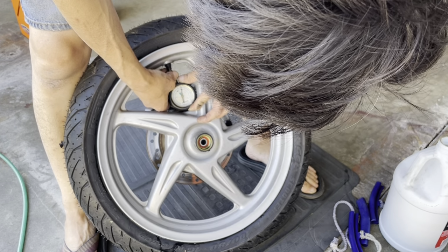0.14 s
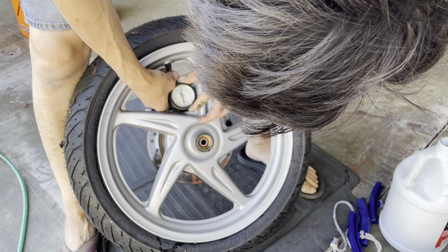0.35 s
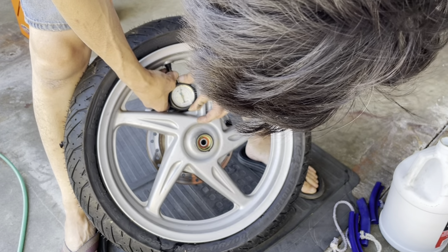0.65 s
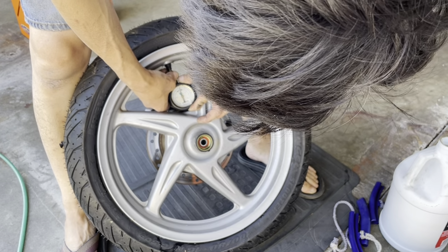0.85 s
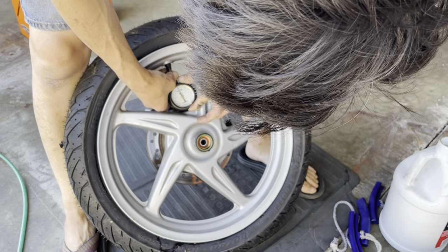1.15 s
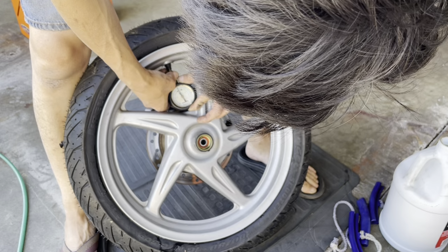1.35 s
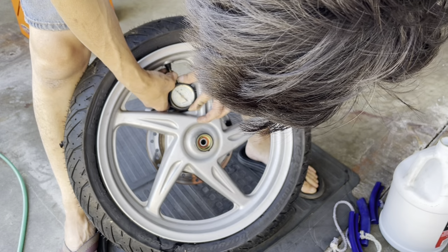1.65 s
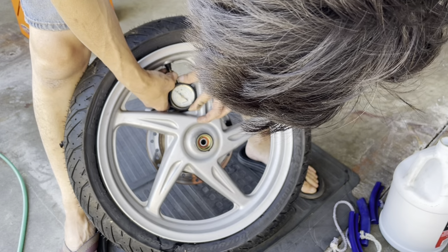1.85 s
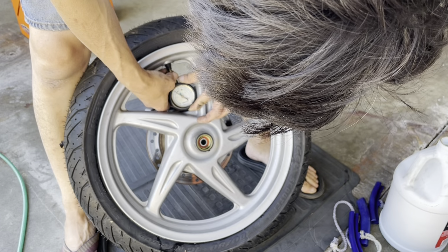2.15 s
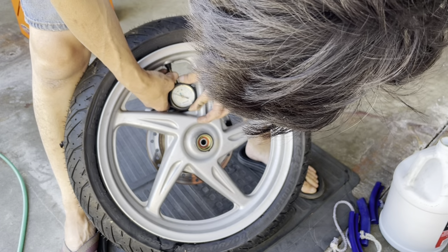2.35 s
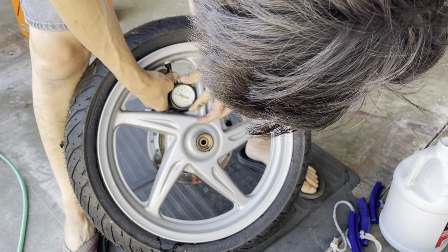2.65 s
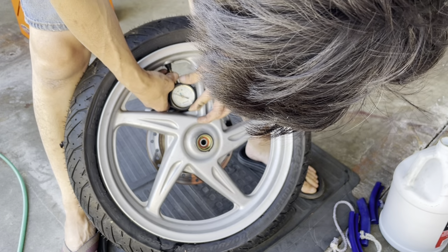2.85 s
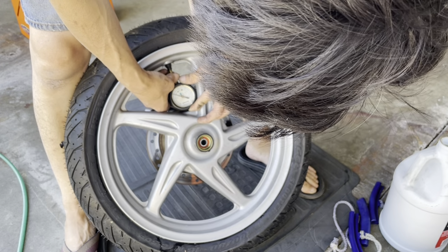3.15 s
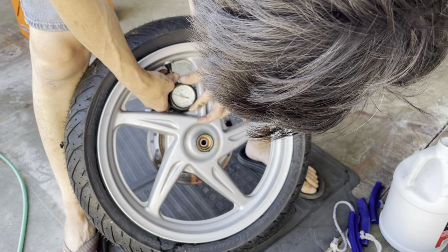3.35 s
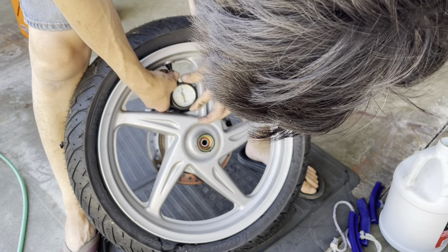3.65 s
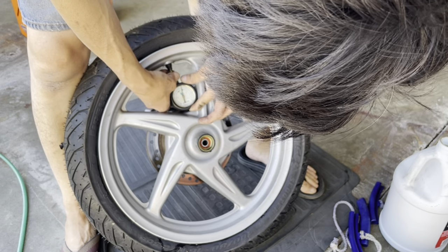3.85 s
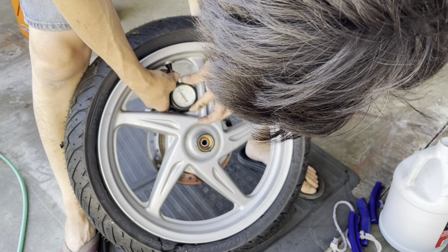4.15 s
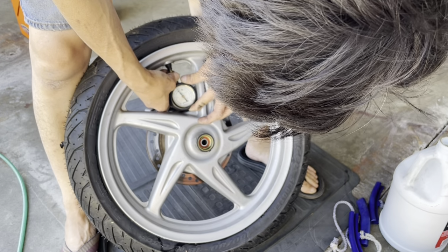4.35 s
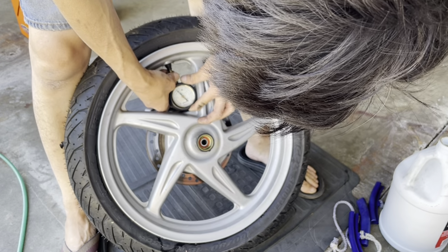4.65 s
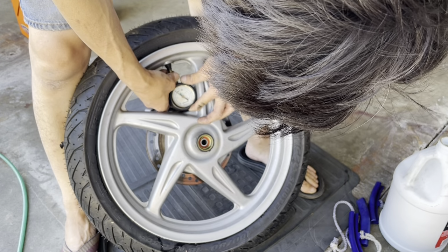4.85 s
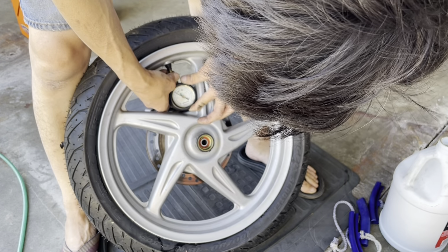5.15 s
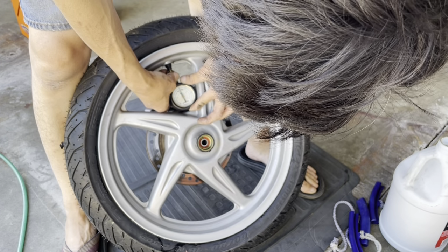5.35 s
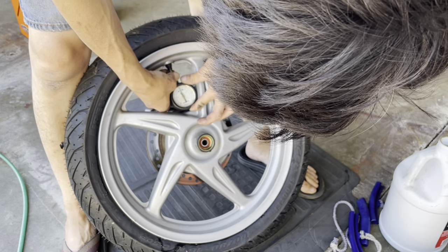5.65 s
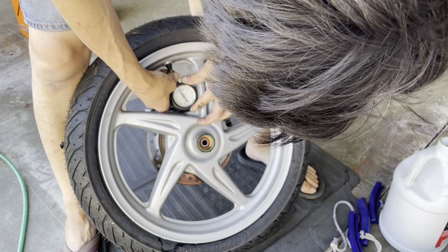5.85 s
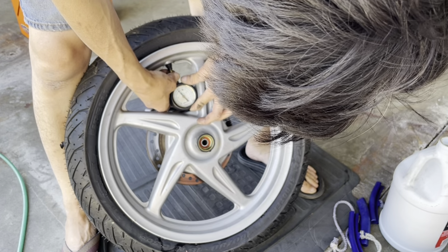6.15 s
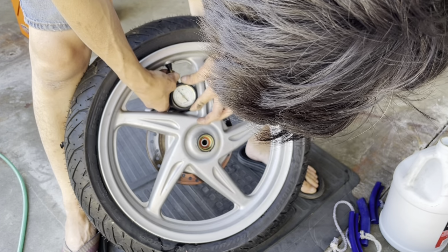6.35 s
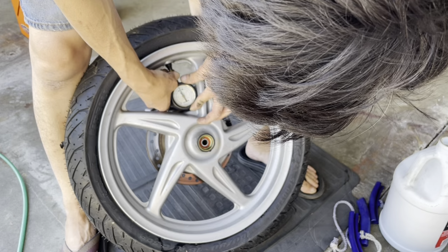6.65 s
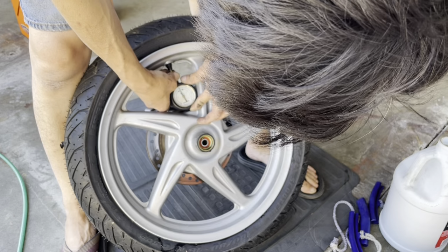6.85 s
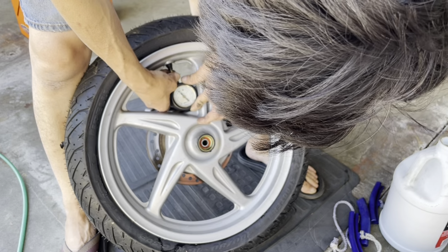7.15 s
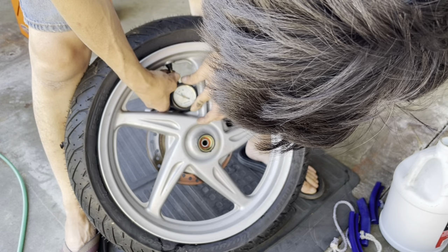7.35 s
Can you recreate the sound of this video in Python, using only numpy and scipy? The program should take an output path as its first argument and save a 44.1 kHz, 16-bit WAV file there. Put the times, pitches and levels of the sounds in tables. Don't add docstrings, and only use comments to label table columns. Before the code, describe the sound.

Close stereo sound in a hard-walled yard. From 0 s a loud, dense, bright hiss of air leaves a scooter tyre valve, with a breathy lower roar that wavers as the pin is pressed. At about 2.4 s it eases a little, then chokes off around 3.4-3.6 s. A thin airy leak and whistle follow, with a dry tick at 3.8 s. A softer second burst cracks open near 3.9 s, grows, and closes after 5.3 s into a narrow whistle. A short, uneven third burst runs about 5.75-6.5 s, followed by a low whistle, a quick slowing rubber creak at 6.6 s and a faint wheeze. The fourth burst seeps in at 6.9 s, swells strongly from 7.1 s and is still hissing at the 7.5 s end. Short echoes surround it; a distant slow engine drones, strongest early, with faint fan hum and low neighbourhood rumble.

```python
import sys
import numpy as np
from scipy import signal
from scipy.fft import rfft, irfft, next_fast_len
from scipy.io import wavfile
from scipy.ndimage import uniform_filter1d

SR = 44100
rng = np.random.default_rng(int(sys.argv[2]) if len(sys.argv) > 2 else 0)


def gain_from_db(level_db):
    decades = np.asarray(level_db, float) / 20
    return 10 ** decades


def pcm_store(signal):
    levels = np.round(np.clip(np.atleast_2d(signal), -1, 1) * 32767)
    wavfile.write(sys.argv[1], SR, levels.astype(np.int16).T)


N = 330309


def evened(x):
    return x / np.sqrt(np.mean(x ** 2) + 1e-20)


def read(points, hz):
    f, value = np.transpose(points)
    return np.interp(np.log(hz + 1), np.log(f + 1), value)


def ports(a, b, same, lead, left_db, right_db):
    same = np.clip(same, 0, 1)
    right = (same * a + np.sqrt(1 - same ** 2) * b) * np.exp(-1j * lead)
    return np.array([a * gain_from_db(left_db), right * gain_from_db(right_db)])


def presses():
    # time in seconds, flow in dB, pin depth as roar
    # over hiss in dB, spill on the rim as blow over hiss in dB.
    long_release = [(0, -29, -5.5, -12), (.1, -25.5, -3.5, -18), (.25, -27, -0.5, -14), (.47, -27, -2, -18.5),
                    (.67, -29, -2, -17), (1.3, -28.5, -3, -15.5), (1.75, -27, -7, -17), (2.38, -27.5, -6, -18.5),
                    (2.43, -30, -4.5, -11), (2.57, -29, -4.5, -9.5), (2.85, -31.5, -2, -8), (3.1, -31, -3.5, -9),
             (3.3, -31.5, -2.5, -11), (3.421, -31.5, -4.5, -6.5)]
    second = [(3.937, -42.5, -9, -20), (3.96, -47, -6, -16), (4.01, -36.5, -4.5, -9.5),
              (4.149, -37, -5, -14.5), (4.349, -35, -6, -15.5), (4.55, -36, -6.5, -14.5),
              (4.75, -32.5, -7.5, -18.5), (5.1, -33, -6.5, -16.5), (5.289, -32, -6.5, -16)]
    third = [(5.763, -37.5, -6.5, -7), (5.81, -41, 9, -10), (5.871, -38, 1, -6.5), (5.95, -34, -5.5, -8),
             (6, -31, -3, -18), (6.1, -34.5, -0.5, -13), (6.25, -33.5, -3.5, -13.5),
             (6.399, -34.5, -2.5, -11), (6.46, -32, -3, -15)]
    fourth = [(6.911, -45, -12, -14), (6.958, -44.5, -5.5, -7), (7.07, -39, -10, -23),
              (7.098, -34, -8.5, -14), (7.112, -34, 0, -16.5), (7.25, -30, -1, -10),
              (7.32, -26.5, -1.5, -22.5), (7.4, -27.5, -1.5, -17), (7.49, -26.5, -3.5, -22.5)]
    # seconds from the first row, flow in dB, lower parts in dB.
    crack_open = [
        (-.17, -63, 0),
        (-.09, -40.5, 11),
        (-.048, -32, -6),
        (-.02, -13, -0.5),
    ]
    # seconds from the last row, flow in dB, lower parts in dB.
    closing = [
        (0.039, -9.5, 1.8),
        (.08, -26, 3.1),
        (.15, -39, 7),
        (0.271, -62, 12),
    ]
    # whistle over hiss in dB, extra seep before the crack in dB.
    seating = [
        (-1.5, 0),
        (-1, -1.5),
        (-3, -7.5),
        (0.5, -0.5),
    ]
    crack_s = .03
    whistle_per_depth = 0.48
    rows = []
    for press, (whistle_db, seep_db) in zip((long_release, second, third, fourth), seating):
        first, last = np.array(press[0]), np.array(press[-1])
        opening = [first + [s, db + seep_db * (s < -crack_s), low, low] for s, db, low in crack_open]
        shutting = [last + [s, db, low, low] for s, db, low in closing]
        for row in opening + press + shutting:
            rows.append([*row, whistle_db + whistle_per_depth * row[2]])
    rows = np.array(rows)
    return rows[np.argsort(rows[:, 0])]


def jet(patchy_db=0.88, flutter_db=0.29, dulling=0.2, ceiling=.4):
    # centre in Hz, usual offset in dB.
    parts = [
        (320, -14.5),
        (1550, -8),
        (2600, -7.5),
        (5700, -7.5),
        (10000, 1.5),
        (13000, -2.5),
        (15300, -4),
    ]
    jet_db = 6.5
    fresh_db, fresh_s, spent_db = 2, 2, -1.5
    rows, frames = presses(), N // 64 + 5
    t, hz = np.arange(frames) * 64 / SR, np.fft.rfftfreq(256, 1 / SR)
    hiss, roar, blow, whistle = (np.interp(t, rows[:, 0], rows[:, k]) for k in range(1, 5))
    centre, usual = np.transpose(parts)

    low_roar = roar + spent_db + fresh_db * np.exp(-t / fresh_s)
    upper = -dulling * np.clip(roar - usual[1], -5, 5)
    flowing = np.clip((hiss + 70) / 15, 0, 1)
    edge = -ceiling * np.clip(hiss + 31, -9, 5) * flowing
    shares = np.array([read(np.c_[centre, one], hz) for one in np.eye(len(parts))])
    levels = np.array([blow, low_roar, roar, whistle, 0 * t, upper, edge])
    offsets = np.clip(levels - usual[:, None], -15, 9)

    a, b, c, d, patches = rng.standard_normal((frames, 129, 5)).T
    patches = uniform_filter1d(patches, size=5, axis=0)
    patches = evened(uniform_filter1d(patches, size=60, axis=1))
    flutter = evened(uniform_filter1d(rng.standard_normal(frames), size=24))
    colour = gain_from_db(shares.T @ offsets + patchy_db * patches + flutter_db * flutter)
    z = np.array([a + 1j * b, c + 1j * d])
    unit = np.std(signal.istft(z, nperseg=256, noverlap=192)[1])
    noise = signal.istft(z * colour, nperseg=256, noverlap=192)[1][:, :N] / unit
    return noise * gain_from_db(jet_db + np.interp(np.arange(N) / SR, t, hiss))


def nearby(a, b):
    # Hz, dB.
    right_colour = [(258, -10), (1000, -8.5), (1650, -6), (2500, -6), (3400, -7.5), (3750, -9.5),
                    (4700, -11.5), (6300, -6.5), (8900, 0.5), (10465, 0.5), (11843, -3.5), (13178, -3),
                    (15590, -4.5),
                    (7000, -6), (7700, -4.5), (14400, -5)]
    # Hz, left minus right in dB.
    facing = [(300, 1.5), (900, 4), (1600, 6), (1800, .5), (2400, .5), (2900, 3), (3700, 1.5), (4100, 4),
              (4450, 2), (4950, 2), (5500, 7), (6000, 5.5), (6200, 3), (6500, 3)]
    # Hz, lead in radians.
    left_lead = [(150, .8), (400, .4), (800, .75), (1550, .8), (1800, 0), (2100, .9), (2400, 0), (2750, 1.1),
                 (3500, 1.6), (3680, 2.1), (3850, .4), (4080, -2.3), (4300, -.4), (5100, -.1),
                 (6700, -2.75), (7600, -3.3), (8300, -4.05), (10400, -5.95), (11700, -6.6), (13800, -9.15),
                 (15050, -9.6), (15700, -10.3)]
    # Hz, likeness from 0 to 1.
    port_likeness = [(170, .9), (450, .98), (950, .85), (1200, .92), (1450, .35), (1800, .98), (2100, .65),
                     (2420, .98), (2900, .75), (3300, .8), (3680, .6), (3950, .3), (4850, .88), (6200, .7),
                     (6550, .8), (6850, .97), (7800, .97), (8400, .88), (10000, .9), (10500, .985),
                 (11700, .985), (12300, .82), (13500, .85), (13900, .97), (15050, .98), (15600, .7)]
    # centre in Hz, width in Hz, left in dB, right in dB.
    stem = [(350, 120, 2, 1), (540, 80, 2.5, 2), (960, 100, 2, 0), (1070, 70, 1, 3), (1270, 80, -3, 1),
            (1370, 70, 0, -4), (1590, 90, 1, 2), (1680, 60, 0, -3), (1770, 70, 0, 2), (2030, 110, -3, 0),
            (2160, 90, 2, -4), (2410, 100, -4, -3), (2780, 160, 2, 2.5), (2980, 120, -3, -2),
            (3200, 200, 1, 1.5), (3720, 200, -5, -4), (4100, 160, 2, 1), (5600, 100, -2, -2),
            (5800, 140, 1.5, -1), (5920, 160, 0, 4), (6800, 200, 1.5, 1.5), (7100, 200, -2, -2),
            (7370, 150, 1.5, 1.5), (7600, 250, -2, -2), (7970, 150, 2, 2), (9200, 250, 1.5, 1.5),
            (9560, 200, 1.5, 1.5), (11025, 500, 4, 4), (13680, 350, -4.5, -4.5), (15120, 250, 3, 3)]
    size = next_fast_len(N + 4096)
    hz = np.fft.rfftfreq(size, 1 / SR)
    right_db = read(sorted(right_colour), hz)
    left_db = right_db + read(facing + [(6800, 0)], hz)
    lead = np.interp(hz, *np.transpose(left_lead))
    same = read(port_likeness, hz)
    z = ports(rfft(a, size), rfft(b, size), same, lead, left_db, right_db)
    for f, width, *db in stem:
        z = z * gain_from_db(np.outer(db, 1 / (1 + (2 * (hz - f) / width) ** 2)))
    z = z * hz ** 2 / (hz ** 2 + 133.0 ** 2)
    return irfft(z, size)[:, :N]


def walls(x):
    # Hz, time to fall 60 dB in seconds.
    decay = [(300, .6), (1500, 0.57), (5000, 0.47), (10000, 0.16), (13000, .25), (15000, 0.1)]
    taps = np.zeros((2, SR))
    at = np.arange(300, SR - 20, 20) + rng.integers(0, 20, (2, (SR - 301) // 20))
    np.put_along_axis(taps, at, rng.choice([-1., 1.], at.shape), 1)
    hz, t, z = signal.stft(taps, SR, nperseg=256)
    tail = signal.istft(z * gain_from_db(-60 * t / read(decay, hz)[:, None]), SR, nperseg=256)[1]
    return signal.fftconvolve(x, tail / np.linalg.norm(tail[0]), axes=1)[:, :N]


def air(patchy_db=5.0):
    # Hz, dB per Hz.
    hush = [(15, -47), (30, -20.5), (60, -1), (125, -11), (202, -13), (300, -16.5), (500, -24), (700, -24),
            (950, -24.5), (1250, -37.5), (2000, -49.5), (3700, -44), (8000, -56.5), (15000, -70)]
    # Hz, likeness from 0 to 1.
    likeness = [(25, 0.87), (50, 0.98), (75, .75), (250, .6), (600, 0), (2000, .1), (10000, .1)]
    frames, hz = N // 512 + 5, np.fft.rfftfreq(2048, 1 / SR)
    a, b, c, d, patches = rng.standard_normal((frames, 1025, 5)).T
    patches = uniform_filter1d(patches, size=6, axis=0)
    patches = evened(uniform_filter1d(patches, size=20, axis=1))
    patches = patches / (1 + hz[:, None] / 900)
    colour = read(hush, hz)[:, None] + patchy_db * patches
    z = ports(a + 1j * b, c + 1j * d, read(likeness, hz)[:, None], 0, colour, colour - .6)
    return gain_from_db(-59) * evened(signal.istft(z, nperseg=2048, noverlap=1536)[1][:, :N])


def order_db(steady_db, swells, t):
    level = gain_from_db(steady_db)
    for s, length, db in swells:
        level = level + gain_from_db(db) * np.cos(np.pi * np.clip((t - s) / length, -.5, .5))
    return 20 * np.log10(level)


def drone(lead=.9, low_lead=.3, waver_db=1.8, drift=.45):
    # time in seconds, firing rate in Hz.
    firing = [(0, 61.06), (1.9, 60.2), (3.3, 60.6), (5.3, 60.3), (7.49, 60.23)]
    orders = (1, 2, 3, 4, 6)
    steady = [-81, -72, -76.5, -73, -78]
    # middle in seconds, length in seconds, dB.
    order_swells = [
        [(0, 4.7, -60), (4.6, 1.4, -64), (5.2, .7, -61), (6.8, 2.7, -63.5)],
        [(.9, 3.6, -47.5), (4.5, 1.1, -54.5), (5.15, 0.92, -58), (7.1, 2.3, -57.5)],
        [(0, 1.84, -53.5), (3.85, 0.94, -64), (4.8, 0.77, -67), (7.3, 2.1, -67.5)],
        [(.4, 3.2, -59), (2.5, 2.3, -66), (3.25, 0.44, -59), (4.3, 1.17, -62), (6.15, 1.09, -63.5),
         (7.49, 1.5, -63)],
        [(2.3, .8, -61), (3.4, 1, -72), (4.5, .7, -67)],
    ]
    t = np.arange(N) / SR
    hz = np.interp(t, *np.transpose(firing))
    turn = 2 * np.pi * np.cumsum(hz) / SR
    slow = rng.standard_normal((10, N // 100 + 1))
    slow = uniform_filter1d(slow, size=60, axis=1)
    slow = evened(uniform_filter1d(slow, size=60, axis=1))
    slow = np.repeat(slow, 100, axis=1)[:, :N]
    slow = uniform_filter1d(slow, size=200, axis=1)
    lag, out = np.array([[0], [lead]]), 0
    for j, (k, db, swells) in enumerate(zip(orders, steady, order_swells)):
        level_db = np.interp(t, t[::100], order_db(db, swells, t[::100])) + waver_db * slow[j]
        port_lag = lag * (low_lead if k == 1 else 1)
        wander = (5 if k == 1 else 1) * drift * slow[j + len(steady)]
        out = out + np.sqrt(2) * gain_from_db(level_db) * np.sin(k * turn - port_lag + wander)
    return out


def fan():
    waver = evened(uniform_filter1d(rng.standard_normal((2, N)), size=9000, axis=1))
    turn = 2 * np.pi * np.cumsum(104 + 1.7 * waver[1]) / SR
    return gain_from_db(-64.5 + 2.5 * waver[0]) * np.sqrt(2) * np.sin(turn)


def seal():
    # start in seconds, length in seconds, centre in Hz, width in Hz, level in dB.
    seeps = [
        (3.606, 0.29, 11600, 5050, -83),
        (3.744, 0.12, 6500, 500, -65.5),
        (3.75, .1, 6950, 250, -64),
        (5.381, 0.17, 6770, 250, -55),
        (6.563, 0.14, 3700, 600, -60),
        (6.802, .09, 8600, 500, -87),
        (6.8, .09, 11500, 400, -82),
    ]
    # time in seconds, level in dB.
    ticks = [
        (3.8015, -45.5),
    ]
    out, t = np.zeros(N), np.arange(N) / SR
    noise = rng.standard_normal(N)
    for s, length, hz, width_hz, db in seeps:
        band = signal.butter(2, [hz - width_hz / 2, hz + width_hz / 2], "band", fs=SR, output="sos")
        swell = np.sin(np.pi * np.clip((t - s) / length, 0, 1) ** 0.81)
        out += gain_from_db(db) * swell * evened(signal.sosfilt(band, noise))
    dull = signal.butter(3, [900, 6000], "band", fs=SR, output="sos")
    for s, db in ticks:
        burst = noise * (t > s) * np.exp(-np.abs(t - s) / .0014)
        out += gain_from_db(db) * signal.sosfilt(dull, burst)
    return out


def creak():
    # start and end in seconds, slips a second at start and end, dB at start and end.
    rubbing = (6.59, 6.675, 300, 75, -58, -43)
    # Hz, width in Hz, dB.
    rings = [
        (3600, 450, 1),
        (4800, 900, -5),
        (9800, 2500, -2),
    ]
    start, end, fast, slow, soft_db, loud_db = rubbing
    t = np.arange(N) / SR
    along = np.clip((t - start) / (end - start), 0, 1)
    rate = fast + (slow - fast) * along ** 2
    turns = np.cumsum(rate * (t > start) * (t < end)) / SR
    left_to_go = np.floor(turns[-1] - turns + 0.069)
    slips = np.diff(left_to_go, prepend=left_to_go[0]) != 0
    slips = slips * gain_from_db(soft_db + (loud_db - soft_db) * along)
    u = t[:600]
    ring = sum(gain_from_db(db) * np.exp(-np.pi * width * u) * np.sin(2 * np.pi * hz * u) for hz, width, db in rings)
    return signal.oaconvolve(slips, ring)[:N]


def scene():
    shared, unrelated = jet()
    valve = nearby(shared + seal() + creak(), unrelated)
    return valve + gain_from_db(-23) * walls(valve) + air() + drone() + fan()


def top_cut(x):
    return signal.sosfilt(signal.butter(12, 15730, fs=SR, output="sos"), x)


def record(dry):
    bass_cut = signal.butter(2, 45., "high", fs=SR, output="sos")
    return top_cut(signal.sosfilt(bass_cut, dry))


dry = scene()
out = record(dry)
pcm_store(out)
```